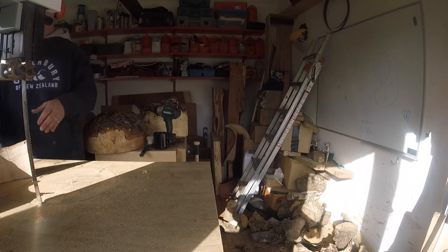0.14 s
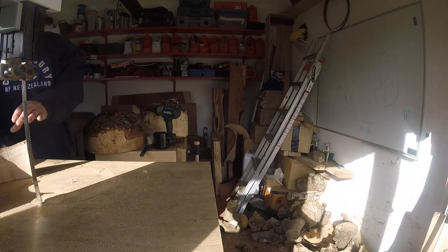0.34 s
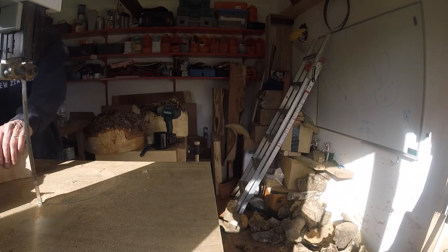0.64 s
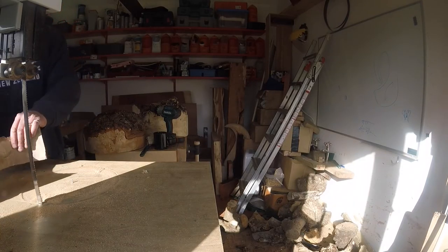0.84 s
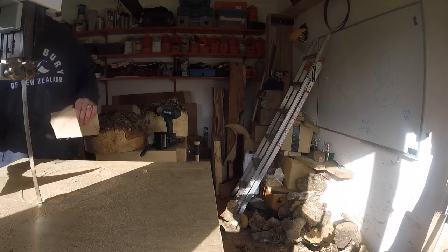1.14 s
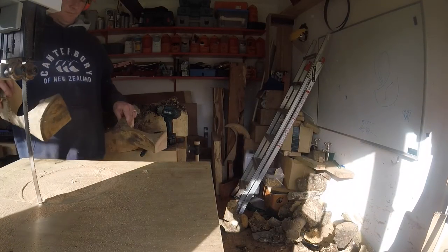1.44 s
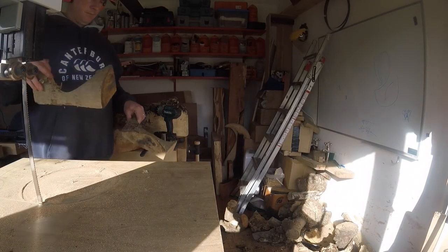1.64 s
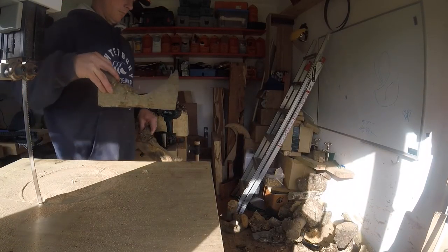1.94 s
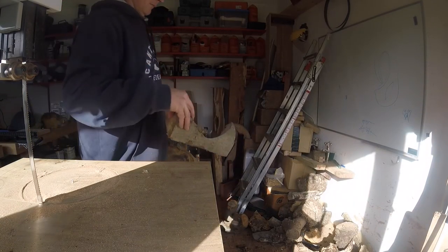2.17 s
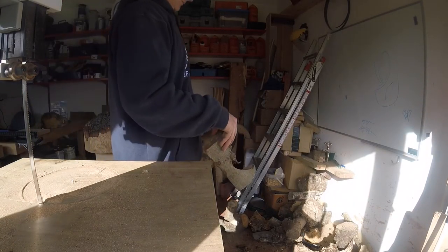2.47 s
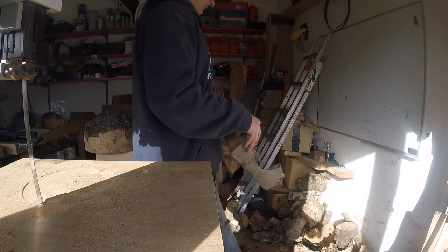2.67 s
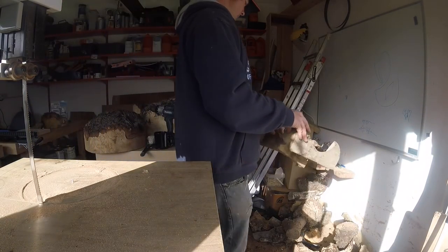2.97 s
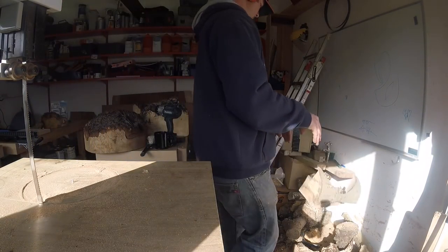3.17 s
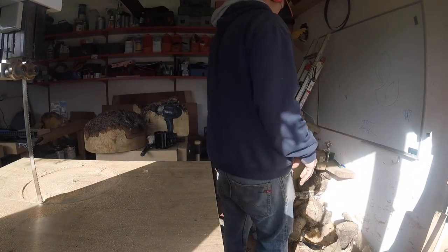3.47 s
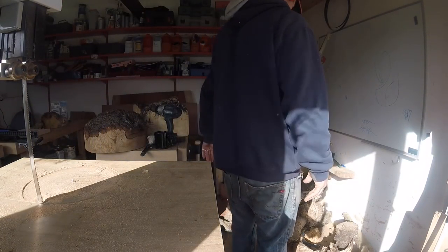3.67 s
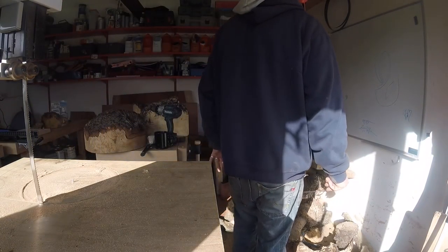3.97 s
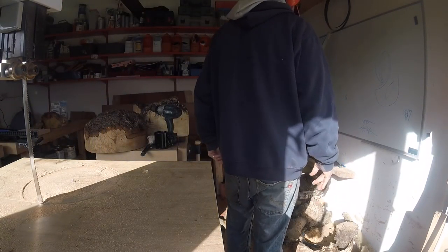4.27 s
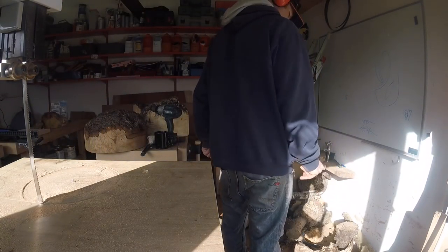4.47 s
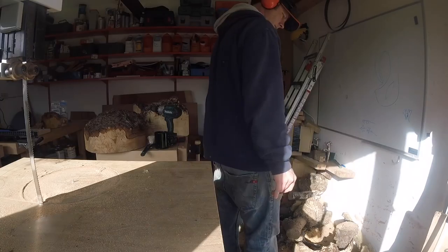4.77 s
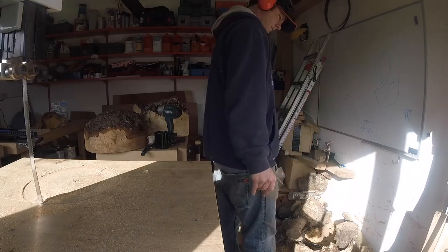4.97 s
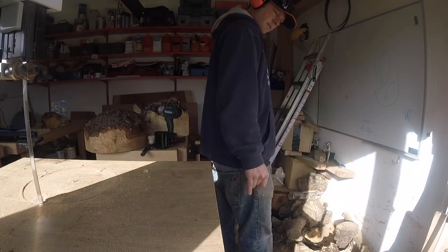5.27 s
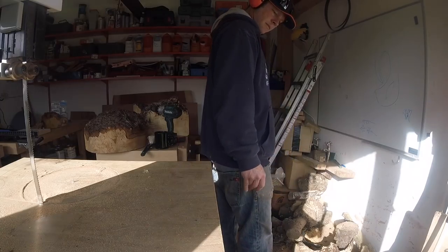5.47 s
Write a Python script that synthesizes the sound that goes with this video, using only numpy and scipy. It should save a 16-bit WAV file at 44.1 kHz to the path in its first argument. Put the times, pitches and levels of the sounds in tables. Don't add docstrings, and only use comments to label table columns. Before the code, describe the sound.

Close, slightly muffled sound inside a shed with a soft steady band saw hum. First a brief scrape, then a cluster of deep wooden thuds, then knocks, rubbing and sharp clinks as offcuts are gathered. Around the middle the pieces hit a pile with a hard hollow clatter and tumble. Only sparse ticks, one clear knock and faint rustling remain over the hum.

```python
import sys
import numpy as np
from scipy import signal
from scipy.io import wavfile
from scipy.ndimage import uniform_filter1d

SR = 44100
rng = np.random.default_rng(int(sys.argv[2]) if len(sys.argv) > 2 else 0)


def voltage_ratio(decibels):
    exponent = np.asarray(decibels, float) / 20
    return 10 ** exponent


def materialize(psi):
    bounded = np.clip(np.atleast_2d(psi).T, -1, 1)
    quanta = np.round(bounded * 32767).astype(np.int16)
    wavfile.write(sys.argv[1], SR, quanta)


N = 247401
STROKE_DB = 30

# (f/Hz, level/dB)
SLAB = [(165, 0), (250, 4.5), (312, 3.5), (385, -0.5), (490, 2.5), (694, -8), (1150, -15), (1595, -16.5)]


def evened(x):
    return x / np.sqrt(np.mean(x ** 2) + 1e-20)


def read(points, hz):
    f, value = np.transpose(points)
    return np.interp(np.log(hz + 1), np.log(f + 1), value)


def add(mix, s, sound):
    part = mix[round(s * SR):][:len(sound)]
    part += sound[:len(part)]


def resonate(x, hz, width):
    turn = np.exp(2j * np.pi * hz * np.arange(len(x)) / SR)
    r = np.exp(-np.pi * width / SR)
    for _ in range(2):
        x = 2 * (turn * signal.lfilter([1 - r], [1, -r], x / turn)).real
    return evened(x)


def ring(hz, t60, phase=0, size=SR // 2):
    t = np.arange(size) / SR
    return voltage_ratio(-60 * t / t60) * np.sin(2 * np.pi * hz * t + phase)


def soft_ring(hz, t60, start, size):
    return ring(hz, t60, size=size) - ring(hz, start * t60, size=size)


def causal(points, size):
    gain = np.log(voltage_ratio(read(points, abs(np.fft.fftfreq(size, 1 / SR)))))
    return np.fft.ifft(np.exp(np.conj(signal.hilbert(gain)))).real[:size // 2]


def stroke(s, rise, fall):
    t = np.arange(N) / SR - s
    return voltage_ratio(-STROKE_DB * np.maximum(-t / max(rise, 1e-3), t / max(fall, 1e-3)))


def three_bands(x):
    # (lowest f/Hz, highest f/Hz)
    bands = [(350, 1360), (1000, 3890), (4000, 9200)]
    return [signal.sosfilt(signal.butter(2, b, "band", fs=SR, output="sos"), x) for b in bands]


def saw():
    hum_hz = [135.89, 164.69, 171.65, 200.4, 207.41, 214.4, 286.0, 407.5, 643.5]
    hum_db = [-50.5, -44.5, -32, -64, -42, -80, -55, -67, -75.5]
    # (f/Hz, width/Hz, level/dB rms)
    frame_parts = [(156.3, 13.3, -44.5), (174.8, 17, -44), (340, 6.3, -71), (377, 7.2, -64), (433, 8, -63),
                   (247.2, 9, -59), (303.2, 6.8, -56), (410.6, 43, -57), (652, 11, -63.5)]
    # (f/Hz, level/dB per Hz)
    air_colour = [(20, -41), (85, -54), (120, -29.5), (150, -15.5), (259, -18.5), (416, -26.5),
                  (581, -23.5), (1100, -28.5), (1580, -28.5), (3000, -36), (5400, -48.5), (6400, -43),
                  (9000, -45), (15500, -58.5)]
    air_db, patch_db = -48, 1.36
    waver_db, waver_per_s = 1.43, 6
    t = np.arange(N) / SR - .1063

    shake = rng.standard_normal(N)
    frame = sum(voltage_ratio(db) * resonate(shake, hz, width) for hz, width, db in frame_parts)

    a, b, patches = rng.standard_normal((N // 512 + 5, 1025, 3)).T
    patches = uniform_filter1d(patches, size=20, axis=0)
    patches = evened(uniform_filter1d(patches, size=8, axis=1))
    level_db = read(air_colour, np.fft.rfftfreq(2048, 1 / SR))[:, None] + patch_db * patches
    air = signal.istft((a + 1j * b) * voltage_ratio(level_db), nperseg=2048, noverlap=1536)[1][:N]

    tones = np.zeros(N)
    for hz, db, steps in zip(hum_hz, hum_db, rng.standard_normal((len(hum_hz), 64))):
        waver = waver_db * np.interp(t * waver_per_s, np.arange(64) - 2, steps)
        tones += np.sqrt(2) * voltage_ratio(db + waver) * np.cos(2 * np.pi * hz * t)
    return tones + frame + voltage_ratio(air_db) * evened(air)


def sway():
    # (strongest t/s, rise t/s, fall t/s, slow rock level/dB, quick rock level/dB)
    pushes = [
        (.69, .25, .5, -63, -64),
        (.93, .3, 0.43, -51, -49),
        (1.07, .3, 0.36, -48, -54),
        (1.45, 0.37, .4, -67, -70),
        (1.8, .8, 0.26, -68, -64),
        (2.2, .8, 0.28, -70, -66),
        (3.37, .06, 0.3, -62, -59),
        (3.84, .03, .1, -68, -66),
    ]
    rest_db = -79
    push = rng.standard_normal(N)
    slow, quick = resonate(push, 33, 19), resonate(push, 66, 30)
    out = voltage_ratio(rest_db) * (slow + quick)
    for s, rise, fall, slow_db, quick_db in pushes:
        out += stroke(s, rise, fall) * (voltage_ratio(slow_db) * slow + voltage_ratio(quick_db) * quick)
    return out


def slides():
    # (hardest t/s, rise t/s, fall t/s, drag level/dB, weight/dB)
    strokes = [(.282, .022, 0.18, -26, 7), (.592, 0.043, 0.083, -37.5, 3), (.726, 0.17, 0.038, -41, 16),
               (.86, 0.12, 0.11, -34, -60), (1.13, .06, 0.09, -44.5, -20), (4.19, 0.087, .1, -40.5, -45),
               (1.61, 0.027, 0.39, -34, 0), (1.674, 0.033, 0.14, -28.5, 14.5), (1.85, 0.29, 0.28, -27, -2),
               (1.98, 0.016, 0.06, -19.5, -2), (2.152, 0.049, 0.068, -35, 3), (2.43, 0.096, 0.18, -32.5, 7),
               (2.521, 0.25, 0.04, -28.5, 4), (2.782, 0.054, .04, -39.5, -14), (2.908, .02, 0.26, -41, -2),
               (3.275, .04, 0.14, -30, 7.5), (3.339, 0.03, 0.17, -14.5, -2), (3.59, 0.21, 0.27, -48, 28.5),
               (3.79, 0.22, .03, -42, -4), (4.9, 0.6, 0.22, -42.5, -19), (5.09, 0.075, .15, -54, -11),
               (5.184, 0.25, 0.15, -40, -2)]
    slip_db = 2.5 * np.minimum(rng.exponential(1, N), 3.5)
    slips = voltage_ratio(slip_db) * rng.standard_normal(N) * (rng.random(N) < 1500 / SR)
    body, middle, grit = map(evened, three_bands(slips))
    out = np.zeros(N)
    for s, rise, fall, drag_db, weight_db in strokes:
        low, high = voltage_ratio(-5.5 + weight_db), voltage_ratio(-18 - 0.12 * weight_db)
        out += voltage_ratio(drag_db - 13.0) * stroke(s, rise, fall) * (middle + low * body + high * grit)
    return out


def judder():
    # (hardest t/s, rise t/s, fall t/s, slab level/dB, boom level/dB against the slab)
    moves = [(.6, 0.022, 0.17, -35, 1), (0.744, 0.23, 0.033, -16, -12), (.845, 0.065, 0.074, -14.5, -2),
             (.91, .05, 0.053, -50, 14), (.97, 0.052, 0.17, -52, 6), (1.116, 0.051, 0.098, -47, 14),
             (1.614, 0.05, 0.18, -27, -16.5), (1.675, 0.019, 0.55, -28.5, 6), (1.845, .06, 0.23, -50, 28),
             (1.976, 0.095, 0.19, -26.5, -10), (2.035, .1, 0.038, -35, -11), (3.338, 0.01, 0.31, -18, -25),
             (3.365, 0.032, 0.14, -14, 4), (3.492, 0.19, .13, -15, -14), (3.586, 0.028, 0.39, -32, -15.5)]
    slip_db = 2.0 * rng.exponential(1, N)
    slips = voltage_ratio(slip_db) * rng.standard_normal(N) * (rng.random(N) < 1500 / SR)
    boom, *upper = [voltage_ratio(g) * resonate(slips, hz, 37) for hz, g in SLAB[:6]]
    slab = evened(sum(upper))
    out = np.zeros(N)
    for s, rise, fall, db, boom_db in moves:
        out += voltage_ratio(db - 9.5) * stroke(s, rise, fall) * (slab + voltage_ratio(boom_db) * boom)
    return out


def thuds():
    # (t/s, peak level/dB, ring f/Hz, brightness/dB per octave, t60/s)
    blows = [(0.594, -14.5, 157, -5, 0.072), (0.629, -10.5, 172, -10.5, 0.07), (0.683, -9, 305, -4, 0.082),
             (0.727, -6.5, 298, -13.5, 0.087), (0.777, -16, 215, -18, 0.09), (0.806, -6.5, 186, -20, 0.23),
             (0.839, 1.5, 346, -17.5, 0.037), (0.882, -13, 192, -10, 0.12), (0.903, -35, 208, -40, 0.09),
             (1.964, -18, 173, 8, 0.038), (3.331, -21, 467, 13, 0.07), (3.363, -5, 230, -6, 0.044),
             (3.388, -6.5, 400, 14.5, 0.15), (3.408, -10, 361, -5, 0.038), (3.429, -22, 250, -1.5, 0.051),
             (3.445, -4.5, 238, -5, 0.03), (3.586, -25, 180, -3, 0.2), (3.833, -14.5, 165, 7.5, 0.18)]
    out = np.zeros(N)
    rise = 1 - np.exp(-np.arange(round(.5 * SR)) / SR / 0.0025)
    for s, db, hz, bright_db, t60 in blows:
        chance = rng.random((len(SLAB), 2))
        t60 = np.clip(t60, .02, .4)
        slab = 0
        for (f, g), (u, v) in zip(SLAB, chance):
            slab_db = g + 0.94 * u + bright_db * np.log2(f / 300)
            slab = slab + voltage_ratio(slab_db) * ring(f, t60, 2 * np.pi * v)
        body = rise * (ring(hz, t60) + 0.2 * slab)
        add(out, s, voltage_ratio(db - 5.0) * body / abs(body).max())
    return out


def clatter():
    # (hardest t/s, rise t/s, fall t/s, peak level/dB, middle ring f/Hz)
    bursts = [
        (1.69, 0.028, 0.24, -27.5, 2180),
        (1.86, 0.033, 0.27, -26, 2740),
        (2.0, 0.034, 0.13, -35, 3020),
        (3.35, 0.019, 0.14, -29, 2820),
        (3.42, .08, .22, -26.5, 1190),
        (3.84, .02, 0.11, -44, 797),
    ]
    count, octaves, spread_db, cycles = 24, 1.093, 10, 31
    out = np.zeros(N)
    for s, rise, fall, db, hz in bursts:
        for when, size, pitch in zip(rng.random(count), *rng.uniform(-0.98, 1, (2, count))):
            at = s - rise / 2 + when * (rise + fall) / 2
            f = hz * 2 ** (octaves * pitch)
            fade_db = -STROKE_DB * max((s - at) / rise, (at - s) / fall)
            knock = soft_ring(f, cycles / f, 2 / cycles, 4096)
            add(out, at, voltage_ratio(db + fade_db + spread_db * size) * knock)
    return out


def solids():
    # (t/s, f/Hz, peak level/dB, t60/s)
    blows = [(.598, 480, -39, .08), (.628, 500, -37, .1), (.679, 460, -24, .09), (.69, 790, -38, .06),
             (.718, 710, -33, .08), (.72, 995, -37, .12), (.724, 1250, -41, 0.09), (.726, 182, -23, .05),
             (.729, 497, -21.5, .12), (2.561, 4496, -43, 0.11), (.856, 378, -20, 0.061),
             (.733, 300, -20, .09), (.812, 705, -32, 0.089), (.822, 385, -17, .08), (.85, 500, -25, .08),
             (.905, 216, -13, 0.033), (1.276, 1054, -27.5, .08), (1.3, 1730, -39, 0.045),
             (1.674, 1420, -22.5, 0.036), (1.69, 2040, -27, .08), (1.738, 2013, -26, .07),
             (1.757, 3210, -29, .04), (1.885, 4080, -26, .06), (2.0, 2490, -21.5, .06),
             (2.142, 1390, -39, .1), (2.666, 1372, -30.5, .07), (3.351, 3120, -15.5, .06),
             (3.363, 173.5, -9, 0.19), (3.366, 480, -14, 0.067), (3.37, 696, -19, 0.08),
             (3.392, 920, -17, .07), (3.41, 437, -11, 0.054), (3.426, 311, -4.5, 0.11),
             (3.43, 585, -22, 0.053), (3.452, 370, -9, .05), (3.836, 1260, -30, 0.086),
             (3.65, 303, -29, .15), (4.706, 1500, -32, .05), (4.714, 1317, -37, .08),
             (4.718, 1905, -35, .06), (4.708, 4250, -39, .025), (4.798, 1790, -40, .06),
             (3.336, 3930, -20, .02), (3.418, 1640, -16, .06), (1.846, 2500, -16, .04),
             (.82, 560, -30, .05)]
    out = np.zeros(N)
    for s, hz, db, t60 in blows:
        add(out, s, voltage_ratio(db) * soft_ring(hz, t60, .06, SR // 5))
    return out


def pings():
    # (t/s, f/Hz, peak level/dB, t60/s)
    offcuts = [(0.73, 178, -13.5, 0.09), (.727, 465, -20.5, 0.052), (0.96, 293, -32.5, 0.79),
               (3.337, 1600, -24, .06), (.836, 700, -26.5, 0.087), (.853, 695, -24, 0.16),
               (.872, 310, -17, 0.046), (.9, 307, -25.5, 0.073), (2.8, 4450, -41.5, 0.13),
               (2.672, 1600, -36, 0.06), (3.826, 600, -36, 0.23), (3.83, 480, -28, 0.25),
               (1.612, 1540, -37, 0.1), (2.656, 1700, -41, 0.11), (3.375, 1670, -19, 0.1),
               (3.366, 1160, -18, 0.13), (3.412, 1150, -24, 0.04), (3.578, 1850, -26, 0.064),
               (3.588, 850, -22.5, 0.17), (3.7, 1300, -34, 0.18), (3.778, 4370, -41, 0.032),
               (3.997, 1860, -38, 0.094), (4.2, 1800, -48, 0.094)]
    spread, side_db = .045, -3
    out = np.zeros(N)
    for (s, hz, db, t60), (below, above) in zip(offcuts, rng.uniform(0.12, 1, (len(offcuts), 2))):
        for split, g in ((1, 0), (1 - spread * below, side_db), (1 + spread * above, side_db)):
            tone = ring(hz * split, t60, size=SR // 3) - ring(hz * split, 0.073 * t60, size=SR // 3)
            add(out, s, voltage_ratio(db - 4.0 + g) * tone)
    return out


def ticks():
    # (t/s, f/Hz, peak level/dB, t60/s)
    splinters = [(.725, 3620, -37, .02), (1.435, 5160, -24.5, 0.005), (1.435, 3230, -28.5, .03),
                 (1.837, 2360, -12.5, 0.026), (2.135, 3200, -31, 0.0057), (1.813, 10000, -40, 0.0046),
                 (1.851, 8500, -39, .004), (1.88, 7970, -35, .005), (1.888, 10500, -35, .006),
                 (1.9, 9500, -32, .006), (1.962, 9000, -36, .005), (1.981, 6940, -30, 0.0055),
                 (1.986, 10000, -32, .008), (1.992, 9000, -30, .008), (2.015, 8000, -34, .006),
                 (2.015, 4000, -27, 0.0089), (3.358, 3700, -19, .008), (3.391, 3000, -21, .008),
                 (3.412, 3900, -19, .008), (3.433, 3200, -25, .008), (2.652, 9800, -20, 0.0012),
                 (2.652, 4700, -27, 0.012), (2.652, 2450, -26.5, 0.024), (2.815, 5470, -39, 0.008),
                 (3.3374, 9100, -23.5, 0.0078), (3.34, 3920, -19, .01), (3.347, 4750, -29, 0.0081),
                 (3.352, 3500, -16, 0.012), (3.3635, 2400, -14, .005), (3.3635, 9000, -25, .004),
                 (3.406, 9600, -24.5, .005), (1.2748, 4500, -30.5, 0.011), (1.2765, 5860, -35, .01),
                 (1.3, 4000, -30, .008), (2.249, 2490, -37, .01), (2.249, 3700, -37, .008),
                 (2.24, 3300, -34, .008), (1.673, 5560, -31, .006), (1.737, 5600, -34, .008),
                 (3.353, 4270, -12.5, 0.013), (3.363, 5870, -21, 0.0074), (3.406, 6030, -28, 0.0066),
                 (3.484, 3220, -23, 0.0089), (3.634, 8500, -46, 0.0065), (3.8253, 6100, -35, 0.0072),
                 (4.7058, 1930, -31.5, 0.025)]
    out = np.zeros(N)
    for s, hz, db, t60 in splinters:
        add(out, s, voltage_ratio(db + 3.0) * soft_ring(hz, min(t60, .012), .04, 1024))
    return out


def chinks():
    # (t/s, peak level/dB)
    strikes = [
        (1.737, -27.5),
        (1.8377, -11.5),
        (1.8696, -17.5),
        (1.9902, -28.5),
        (2.2385, -36),
    ]
    # (f/Hz, level/dB, t60/s)
    steel = [(2250, -6, 0.017), (2543, -6.5, 0.038), (2554, 1, 0.021), (2710, -15, 0.014),
             (3300, -15, 0.033), (3970, -9, 0.022), (5740, -12.5, 0.01)]
    out = np.zeros(N)
    rise = 1 - np.exp(-np.arange(round(.5 * SR)) / SR / 0.000087)
    for s, db in strikes:
        tones = 0
        for hz, g, t60 in steel:
            tones = tones + voltage_ratio(db - 2.5 + g) * ring(hz, min(t60, .05), 2 * np.pi * rng.random())
        add(out, s, rise * tones)
    return out


def knocks():
    # (t/s, peak level/dB, ring f/Hz, body/dB, snap/dB against the peak)
    handled = [(0.256, -28, 1520, 2, -24), (0.724, -36, 1020, 13, -12), (1.274, -19, 1820, 0.5, -16),
               (1.301, -32, 1700, 0, -12), (1.4339, -22, 1540, -25, -12.5), (1.592, -30.5, 1580, -7, -20),
               (1.6716, -12.5, 2100, -9.5, -20), (1.7355, -18.5, 2070, -19, -13.5),
               (1.8347, -20, 2550, -7, -11), (1.9012, -25, 2530, -9, -2), (1.9794, -16, 2360, -5, -5.5),
               (2.1339, -29.5, 3260, -26, -25), (2.2386, -42, 2580, -25, -7), (2.4031, -25.5, 1730, 0, -35),
               (2.5604, -38, 4500, -19, 1), (2.6521, -20.5, 1510, -14.5, -8), (2.6946, -40.5, 1420, 5, -23),
               (2.7786, -32, 3900, -11, -4), (2.8144, -33, 975, -21, -12), (2.9084, -33.5, 2430, -9, -12),
               (2.9911, -35, 997, -5, -22)]
    # (t/s, peak level/dB, ring f/Hz, body/dB, snap/dB against the peak)
    landed = [(3.3349, -8, 1300, 3.5, -8), (3.3494, -7.5, 3250, 2, -18), (3.3635, -12, 1190, 13.5, -5.5),
              (3.406, -6, 900, 4, -13), (3.4876, -14, 1350, -19, -14.5), (3.5763, -26, 1860, 11.5, -33),
              (3.6334, -35, 870, 0, -7), (3.7015, -23.5, 1360, -18, -22), (3.7764, -34, 2190, -3, -21),
              (3.825, -19.5, 1300, 1, -14), (3.9964, -39.5, 1930, 7, -24), (4.2051, -40, 1630, -23, -14),
              (4.7064, -20, 1600, -19, -13), (4.801, -34, 1940, -12, -9)]
    direct, sent = np.zeros((2, N))
    for rows, near_db in ((handled, 1.64), (landed, 2.5)):
        for s, db, hz, body_db, snap_db in rows:
            colour = [(150, body_db - 1.5), (600, body_db + 8.5), (1300, 0.5), (3000, -4.0),
                      (6300, snap_db + 2.0), (7600, snap_db - 3), (11000, snap_db - 3.5),
                      (14500, snap_db - 18), (20000, snap_db - 54)]
            click = voltage_ratio(-10.0) * ring(hz, 0.0053, size=512) + causal(colour, size=1024) * voltage_ratio(15.5)
            add(direct, s, voltage_ratio(db + near_db) * click)
            add(sent, s, voltage_ratio(db - near_db) * click)
    return direct, sent


def shed(x):
    # (f/Hz, t60/s)
    fade = [(200, 0.6), (500, 0.34), (1500, 0.44), (3500, 0.35), (9000, 0.31)]
    # (f/Hz, level/dB)
    tone = [(300, -2), (2000, 1), (5000, 0.5), (11000, -6)]
    out, turn = np.zeros(N), np.arange(N) / SR * 2.3
    for k in range(3):
        taps, at = np.zeros(SR), np.arange(60, SR - 20, 20)
        early = 1 + 0.48 * np.exp(-at / SR / 0.1)
        taps[at + rng.integers(0, 20, len(at))] = early * rng.standard_normal(len(at))
        hz, t, z = signal.stft(taps, SR, nperseg=256)
        level_db = read(tone, hz)[:, None] - 60 * t / read(fade, hz)[:, None]
        tail = signal.istft(z * voltage_ratio(level_db), SR, nperseg=256)[1]
        share = np.sqrt(2 / 3) * np.cos(np.pi * (turn + k / 3))
        out += signal.fftconvolve(x * share, tail / np.linalg.norm(tail))[:N]
    return out


def housing(x):
    # (f/Hz, level/dB)
    mic = [(60, -34.5), (105, -36.5), (135, -1.5), (6000, 1), (9500, -0.5), (12500, -8.5), (16000, -6)]
    return signal.fftconvolve(x, causal(mic, size=8192))[:N]


def scene():
    hits, sent = knocks()
    steel = chinks()
    rings = pings() + solids()
    near = ticks()
    bumps = thuds() + judder()
    drag = slides()
    loose = clatter()
    to_shed = voltage_ratio(9) * sent + voltage_ratio(4) * steel + voltage_ratio(-12.5) * rings + voltage_ratio(-6.5) * near
    to_shed += voltage_ratio(-9.5) * bumps + voltage_ratio(-1.5) * drag + voltage_ratio(-8) * loose
    wet = shed(to_shed)
    work = voltage_ratio(-6.5) * hits + voltage_ratio(0.5) * steel + rings + near + bumps + drag + loose + wet
    return (saw() + sway() + housing(work))[None]


def roll_off(x):
    return signal.sosfilt(signal.butter(12, 15750, fs=SR, output="sos"), x)


def record(dry):
    over = np.maximum(abs(dry) - .8, 0)
    room = .12
    rounded = dry - np.sign(dry) * (over - room * np.tanh(over / room))
    edge = signal.firwin(255, 15250, window=("kaiser", 9), fs=SR)
    return roll_off(signal.oaconvolve(rounded, edge[None], "same"))


dry = scene()
out = record(dry)
materialize(out)
```